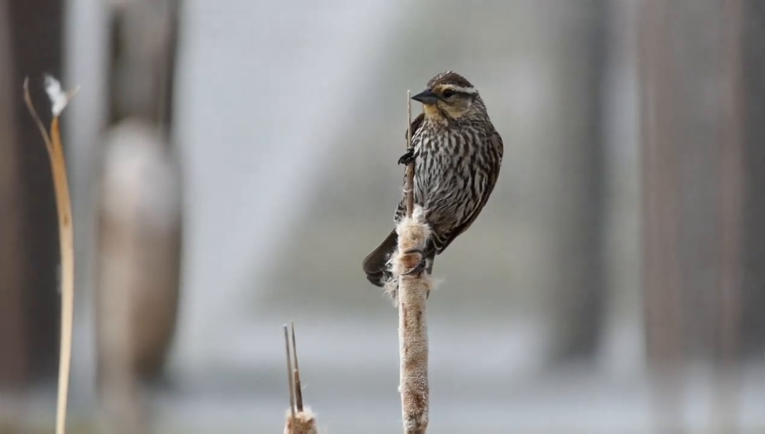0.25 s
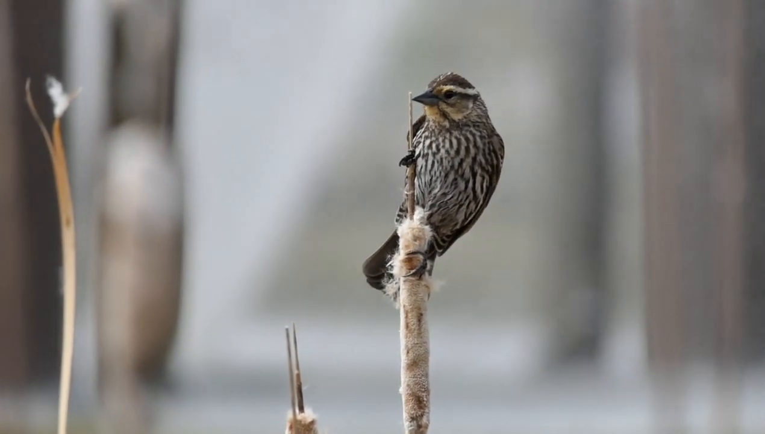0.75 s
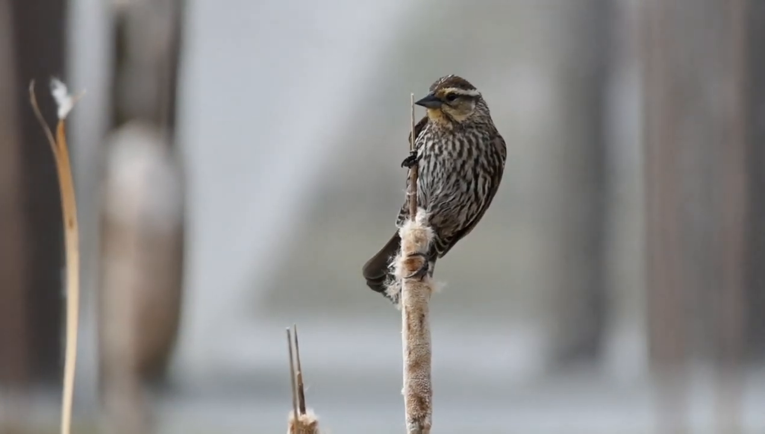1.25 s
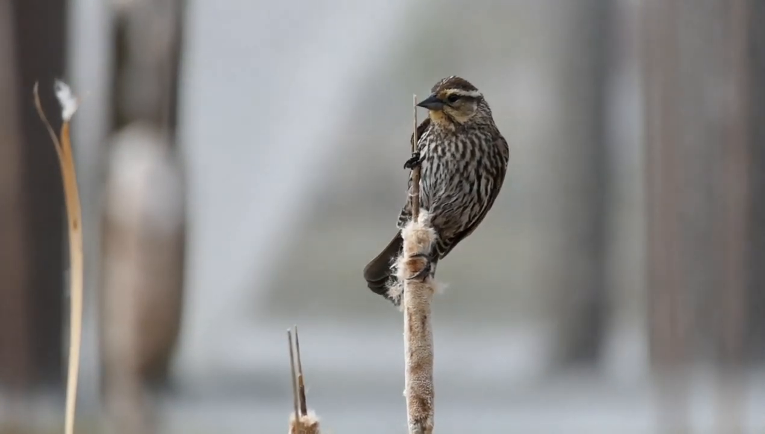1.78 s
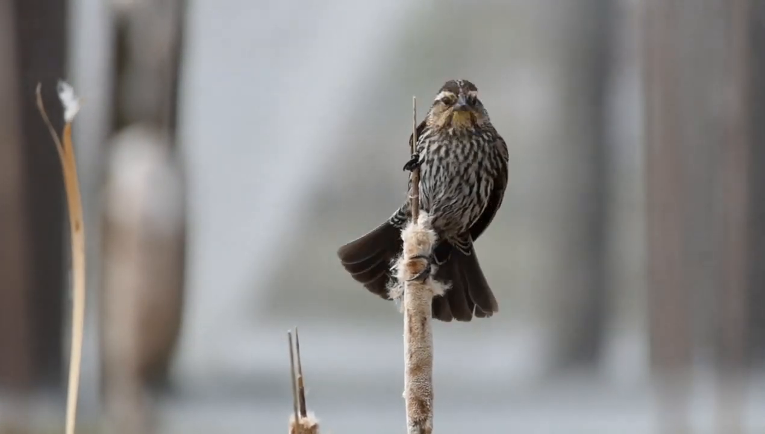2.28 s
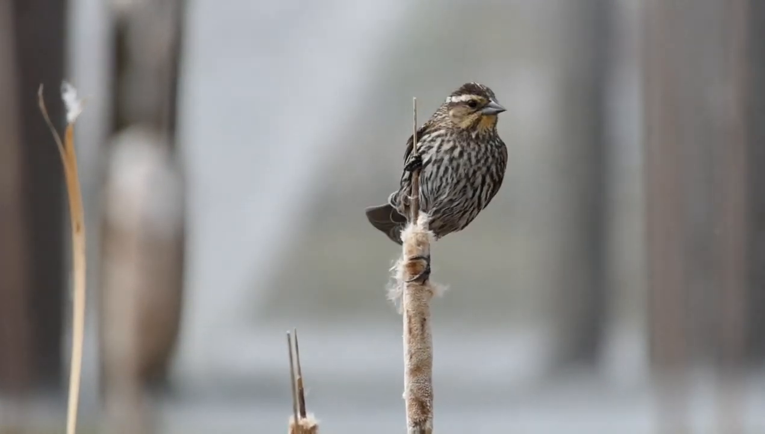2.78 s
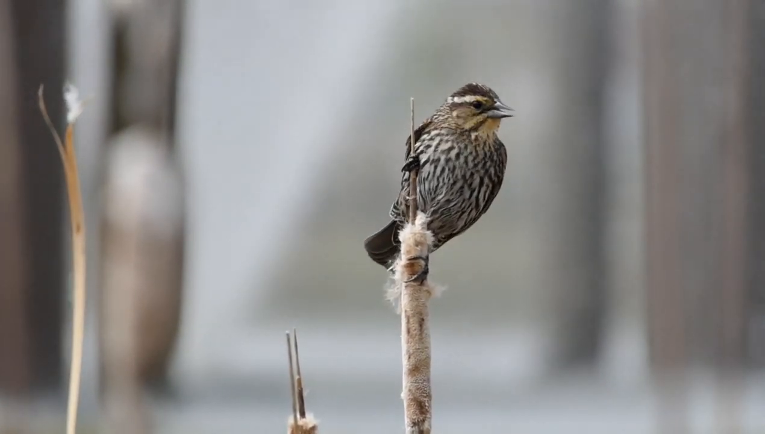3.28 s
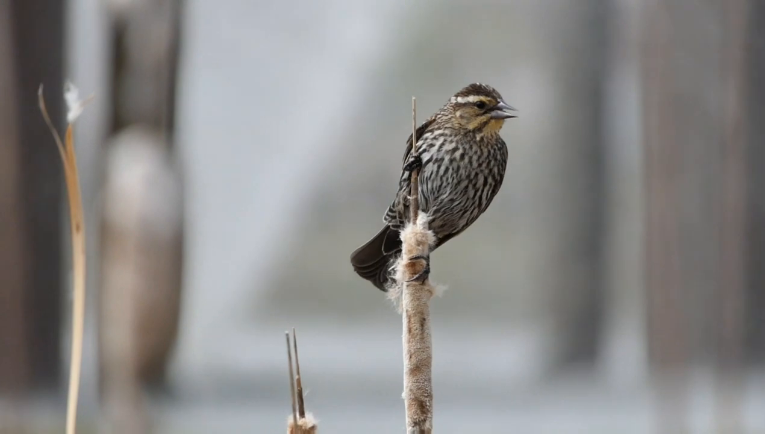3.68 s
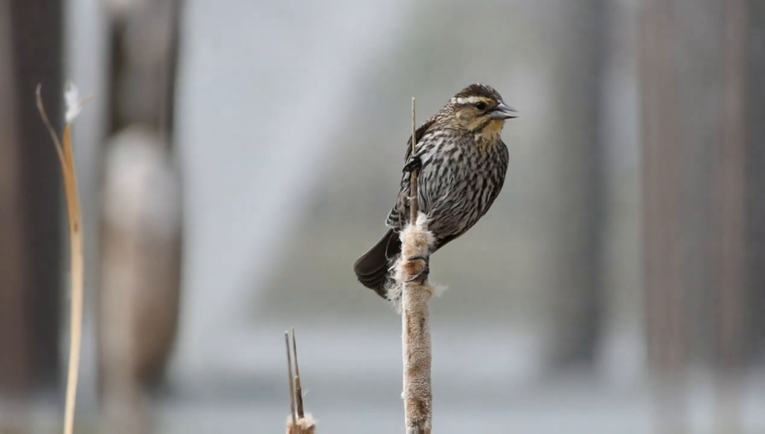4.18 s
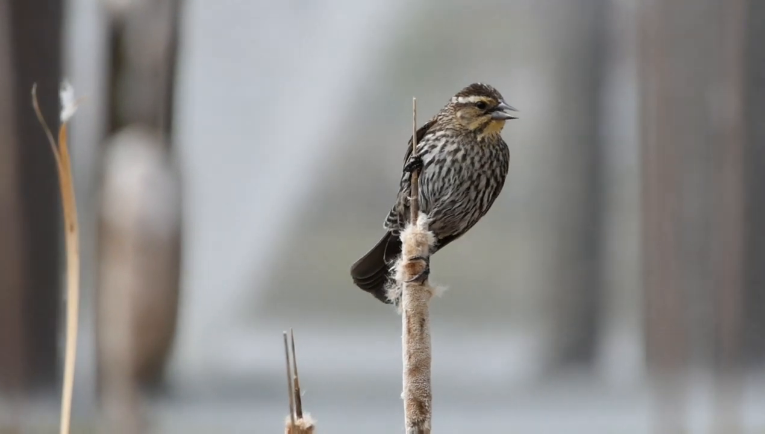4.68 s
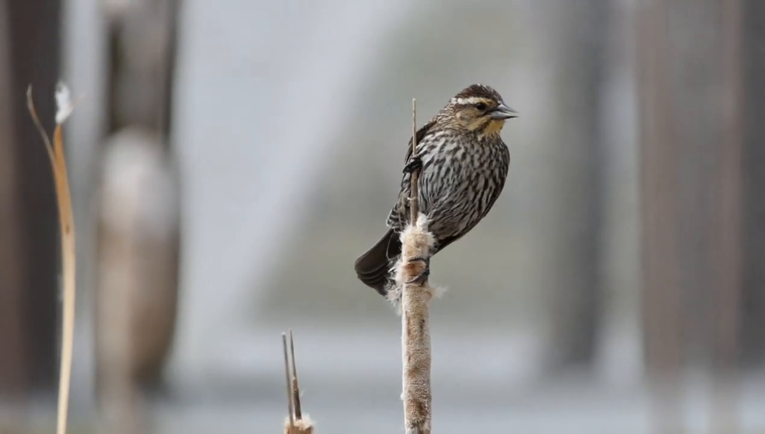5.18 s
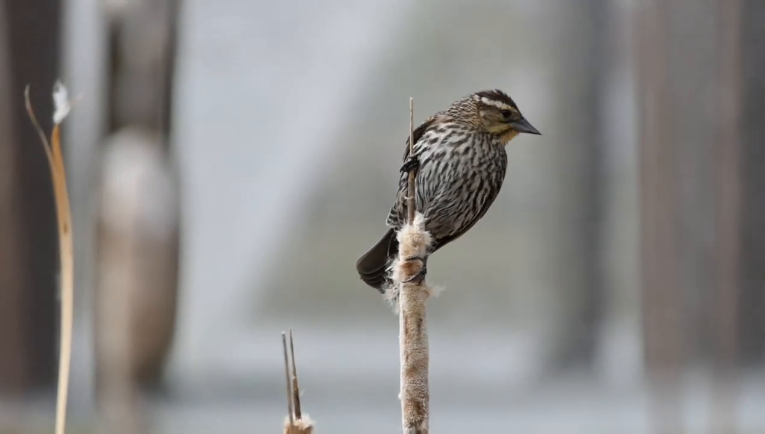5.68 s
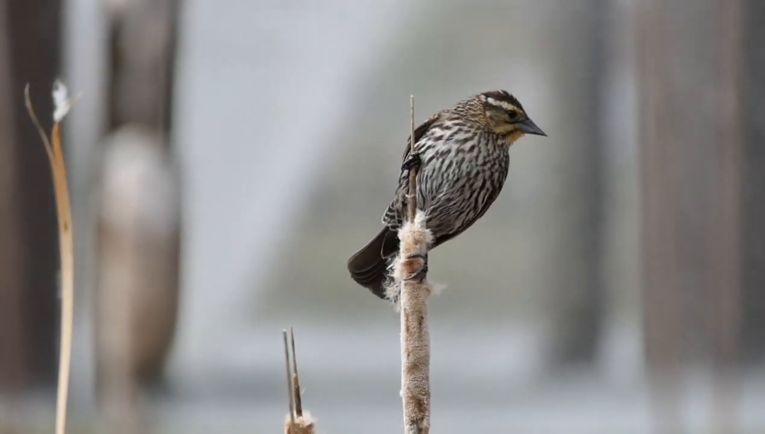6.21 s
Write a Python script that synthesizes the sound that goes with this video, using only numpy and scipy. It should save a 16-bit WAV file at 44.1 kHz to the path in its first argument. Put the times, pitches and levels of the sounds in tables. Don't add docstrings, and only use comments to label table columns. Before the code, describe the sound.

A near streaky brown bird on a reed rasps twice, and another to the left whistles a high note that drops and flattens. Small dry clicks follow, a second whistle, more chacks, then a fast gliding chatter in the centre that gets louder. A faint last whistle wavers out. Distant tyres and engines drone throughout; the reeds give light echoes, and the close microphone sounds slightly dull on top.

```python
import sys
import numpy as np
from scipy import signal
from scipy.fft import rfft, irfft, next_fast_len
from scipy.io import wavfile
from scipy.ndimage import uniform_filter1d

SR = 44100
rng = np.random.default_rng(int(sys.argv[2]) if len(sys.argv) > 2 else 0)


def boost_factor(decibels):
    exponent = np.asarray(decibels, float) / 20
    return 10 ** exponent


def int16_out(signal):
    q = np.round(np.clip(np.atleast_2d(signal).T, -1, 1) * 32767)
    wavfile.write(sys.argv[1], SR, q.astype(np.int16))


N = 284445
T = np.arange(N) / SR

# (frequency [Hz], level [dB per Hz])
ROAR = [(41, -50), (70, -3), (96, -18), (176, -3), (210, -1.5), (249, -10), (288, -6.5), (368, -21.5),
        (491, -7.5), (567, -7.5), (646, -4), (861, -12.5), (1270, -7), (2020, -18), (2200, -17),
        (2860, -48), (4840, -120)]
# (frequency [Hz], level [dB per Hz])
HISS = [(1060, -12.5), (1800, -1.5), (2090, -10.5), (2360, -2), (2980, -0.5), (3600, -5.5), (4650, -14),
        (5120, -11.5), (6350, -15.5), (7630, -14.5), (8670, -21.5), (10100, -29.5), (11200, -36),
        (11700, -37), (12100, -80), (15800, -109), (22000, -120)]
# (frequency [Hz], likeness [0 to 1])
LIKENESS = [(60, 0.33), (130, 0.94), (270, 0.77), (570, 0.92), (1220, 0.86), (2590, 0.92), (5500, 0.84),
            (11700, 0.77)]
# (frequency [Hz], left over right [dB])
TRAFFIC_TILT = [(60, -0.5), (170, -0.5), (490, -2.5), (1420, -0.5), (4070, 0), (11700, -0.5)]

# (pitch [Hz], pitch wander [Hz], level wander [dB])
DRONES = [(172.7, 1.26, 0), (239.8, 1.37, 2)]
# (start [s], length [s], level [dB])
LOWER_SURGES = [(0.042, 0.41, -29), (0.462, 0.13, -26), (.66, 0.15, -26.5), (.88, .5, -32),
                (1.935, 0.3, -29.5), (2.277, 0.21, -28), (2.59, 0.28, -31), (3.48, 0.29, -36),
                (4.04, 0.079, -31), (4.35, 0.14, -32.5), (5.188, 0.57, -35.5), (5.84, 0.93, -31)]
# (start [s], length [s], level [dB])
UPPER_SURGES = [(0.017, 0.83, -33), (0.863, 0.86, -28.5), (1.955, 0.89, -29), (2.87, 0.087, -25),
                (3.214, 0.29, -27.5), (3.56, 0.09, -26), (3.87, .19, -28.5), (4.17, 0.19, -30.5),
                (4.6, 0.4, -45), (6.226, 0.31, -37)]
# (pitch [Hz], level over the deep tone [dB])
DEEP_TONES = [(54, 0), (107, -2.5), (135, 2.5), (312, -3), (265, -6)]
# (time [s], spread [s], level [dB])
PASSES = [
    (.4, 0.27, 4),
    (2.3, 0.23, 0.5),
    (4.55, .35, 2.5),
]

# (peak time [s], spread [s], level [dB], buzz [Hz])
CHACKS = [
    (0.016, 0.011, -19.5, 461),
    (0.078, 0.013, -11, 399),
    (3.25, .011, -14, 452),
    (3.459, 0.013, -11.5, 478),
    (3.559, 0.013, -31, 428),
    (3.692, 0.027, -24.5, 450),
    (4.354, 0.012, -23, 453),
    (4.862, 0.0065, -44, 300),
    (4.891, .006, -31, 450),
    (4.936, 0.011, -26, 539),
]
# (frequency [Hz], width [Hz], level [dB])
CHACK_THROAT = [(2560, 680, 4), (3294, 740, 6), (5270, 870, -21), (7000, 1260, -16), (10070, 760, -23),
                (1360, 310, -3)]

# (time [s], peak level [dB], ring [Hz])
TICKS = [(0.628, -13, 2570), (1.631, -23, 2940), (2.0518, -13, 3030), (2.071, -14, 3000),
         (2.0892, -16, 2240), (2.1155, -9, 2760), (2.1829, -11, 2900), (2.361, -11.5, 2930),
         (2.733, -15, 2730), (2.7531, -13, 3060), (3.3728, -14, 2480), (3.877, -10, 2760),
         (5.728, -20, 2470), (6.2984, -13, 2520)]

# (time [s], length [s], level [dB], from [Hz], to [Hz])
CHIRPS = [
    (.751, .010, -22, 3700, 4500),
    (4.898, .006, -19, 2300, 3400),
    (5.383, .004, -33, 5200, 8200),
]

# (crest time [s], late sag [Hz per s], last bend length [s], last bend [Hz], overtones [dB])
WHISTLES = [
    (.778, -41, 0.039, -130, 0.5),
    (2.8, -250, .12, 129.5, 1.5),
    (5.353, -230, .075, 87, -14),
]
# (time [s], level [dB])
WHISTLE_LEVEL = [
    [(0.765, -27), (0.791, -6), (0.815, -4), (0.925, -12), (0.955, -5), (1.117, -4.5), (1.263, -11),
     (1.285, -32), (1.29, -38)],
    [(2.79, -23), (2.804, -13), (2.83, -4.5), (2.92, -7.5), (2.932, -10.5), (3.166, -5), (3.258, -11.5),
     (3.278, -17), (3.305, -37)],
    [(5.338, -35), (5.382, -12.5), (5.46, -16.5), (5.47, -29.5), (5.5, -13), (5.79, -15), (5.828, -26),
     (5.836, -21), (5.85, -36)],
]
WHISTLE_LIFT = [0, 18, -5.5]
# (time after the crest [s], pitch [Hz])
FALL = [(-.014, 3270), (0, 3470), (.008, 3400), (.022, 3060), (.034, 2825), (.052, 2680), (.085, 2590),
        (.2, 2500), (.29, 2466)]
# (frequency [Hz], left over right [dB])
WHISTLE_PAN = [(2450, 7.5), (2700, 8.5), (3400, 4)]
# (multiple of the pitch, level under the tone [dB])
OVERTONES = [(2, -42), (3, -28), (4, -56)]

# (time [s], length [s], level [dB], swell from start to end [dB])
NOTES = [
    (3.803, .040, -15, -3),
    (3.906, 0.049, -14.5, -4),
    (4.018, 0.05, -11.5, 2),
    (4.131, .058, -12.5, 3),
    (4.248, 0.054, -11.5, 6),
    (4.372, 0.053, -13.5, -4),
    (4.487, .059, -9, 3),
    (4.615, .057, -8.5, 3.5),
    (4.752, 0.053, -7.5, 7),
]
# (first crest [Hz], dip [Hz], second crest [Hz])
TUNES = [
    (3600, 3620, 3880),
    (3600, 2900, 3100),
    (3570, 3330, 3760),
    (3450, 3260, 3330),
    (3290, 3130, 3170),
    (3224, 3060, 3180),
    (3520, 2930, 3524),
    (3350, 3120, 3440),
    (3256, 3230, 3150),
]
NOTE_KNOTS = [0, .16, .27, .54, .76, 1]
HEAD_TURN = (1.5, -2.2)
# (frequency [Hz], level [dB])
CHATTER_THROAT = [(2200, 1.5), (2800, 0.5), (3200, 3), (3700, -2.5)]
# (time [s], level [dB])
BREAKS = [(3.826, -2), (3.932, -10), (3.942, -11), (4.056, -2), (4.179, -7), (4.383, -2), (4.399, -20),
          (4.410, -13), (4.501, -5), (4.512, -4), (4.269, -2), (4.633, -3.5), (4.657, 0), (4.791, -3)]

# (time [s], level [dB])
GAIN = [(0, -1), (.5, 0), (.78, 0), (1.15, -3.5), (2.0, -1.5), (2.65, 0), (2.98, -2), (3.7, 0), (4.74, 1.5),
        (4.9, 3), (4.908, -4.5), (5.2, -4.5), (6.05, -3.5), (6.45, -3)]
# (frequency [Hz], width [Hz], level [dB])
NOTCH = (4640, 110, -6)


def evened(x):
    return x / np.sqrt(np.mean(x ** 2) + 1e-20)


def read(points, hz):
    f, value = np.transpose(points)
    return np.interp(np.log(hz + 1), np.log(f + 1), value)


def curve(rows, t=T):
    return np.interp(t, *np.transpose(rows))


def pan(x, db):
    left = boost_factor(db) / (1 + boost_factor(db))
    return 2 * np.array([left * x, (1 - left) * x])


def wander(size):
    once = uniform_filter1d(rng.standard_normal(N), size)
    return evened(uniform_filter1d(once, size))


def wash(spectrum, band, patchy_db):
    frames, hz = N // 512 + 5, np.fft.rfftfreq(2048, 1 / SR)
    a, b, c, d, patches = rng.standard_normal((frames, 1025, 5)).T
    patches = uniform_filter1d(patches, size=20, axis=0)
    patches = evened(uniform_filter1d(patches, size=6, axis=1))
    same = np.clip(read(LIKENESS, hz), -1, 1)[:, None]
    left = a + 1j * b
    right = same * left + np.sqrt(1 - same ** 2) * (c + 1j * d)
    right = right / boost_factor(read(TRAFFIC_TILT, hz))[:, None]
    gain = boost_factor(read(spectrum, hz))
    spectra = np.array([left, right]) * gain[:, None] * boost_factor(patchy_db * patches)
    x = evened(signal.istft(spectra, nperseg=2048, noverlap=1536)[1][:, :N])
    inside = (hz > band[0]) & (hz < band[1])
    return x * np.sqrt(np.sum(gain ** 2) / np.sum(gain[inside] ** 2))


def traffic():
    roar = wash(ROAR, (400, 1800), patchy_db=1.0) * boost_factor(-23.5)
    hiss_db = -37 + 0.45 * np.maximum(curve(GAIN), 0) + 0.81 * wander(size=300)
    hiss = wash(HISS, (4500, 7000), patchy_db=1.33) * boost_factor(hiss_db)
    return roar + hiss


def hum():
    idle_db, edge_s = -31.5, 0.043
    drones, tones = np.zeros(N), np.zeros((2, N))
    for surges, (hz, width, db) in zip((LOWER_SURGES, UPPER_SURGES), DRONES):
        size = boost_factor(idle_db)
        for s, length, surge_db in surges:
            size = size + boost_factor(surge_db) * np.clip(np.minimum(T - s, s + length - T) / edge_s, 0, 1)
        phase = 2 * np.pi * np.cumsum(hz + width * wander(size=3000)) / SR
        waver_db = db * wander(size=3000) + wander(size=1500)
        drones += size * boost_factor(waver_db) * np.sin(phase)
    deep_db = -40 + sum(db * np.exp(-((T - s) / spread) ** 2) for s, spread, db in PASSES)
    for k, (hz, db) in enumerate(DEEP_TONES):
        phase = 2 * np.pi * np.cumsum(hz * (1 + wander(size=5000) / 300)) / SR
        waver_db = k * wander(size=4000)
        lead = 0.59 * DEEP_TONES[0][0] / hz * np.array([[.5], [-.5]])
        tones += boost_factor(deep_db + db + waver_db) * np.sin(phase + lead)
    return np.sqrt(2) * (pan(drones, -2.6) + tones * boost_factor(np.array([[-.4], [.4]])))


def resonate(x, hz, width):
    turn = np.exp(2j * np.pi * hz * np.arange(len(x)) / SR)
    r = np.exp(-np.pi * width / SR)
    return 2 * (turn * signal.lfilter([1 - r], [1, -r], x / turn)).real


def chacks():
    out, reach = np.zeros(N), 2500
    for s, spread, db, buzz_hz in CHACKS:
        peak = round(s * SR)
        t = np.arange(-min(reach, peak), reach) / SR
        jitter, strength, breath = rng.standard_normal((2 * reach, 3))[:len(t)].T
        buzz = buzz_hz * (1 + 0.23 * evened(uniform_filter1d(jitter, size=60)))
        cycles = np.floor(np.cumsum(buzz) / SR)
        pulses = np.diff(cycles, prepend=0) * (1 + 0.27 * strength)
        drive = evened(pulses) + breath
        throat = np.zeros(len(t))
        for k, (hz, width, level_db) in enumerate(CHACK_THROAT):
            ring = resonate(resonate(drive, hz, width), hz, width)
            throat += (-1) ** k * boost_factor(level_db) * ring
        swell = np.exp(-.5 * abs(t / spread) ** 2)
        out[peak + reach - len(t):peak + reach] += boost_factor(db) * evened(throat) * swell
    return pan(out, -0.43)


def marsh(x, first_s, t60):
    size, gap = SR // 2, 40
    taps = np.zeros((2, size))
    at = np.arange(round(first_s * SR), size - gap, gap)
    at = at + rng.integers(0, gap, (2, SR // 80))[:, :len(at)]
    signs = rng.choice([-1., 1.], (2, SR // 80))[:, :at.shape[1]]
    np.put_along_axis(taps, at, signs, 1)
    taps[1] = taps[0] + 0.53 * taps[1]
    taps *= boost_factor(-60 * T[:size] / t60)
    return signal.oaconvolve(x, taps / np.linalg.norm(taps[0]), axes=1)[:, :N]


def ticks():
    out, t = np.zeros(N), np.arange(300) / SR
    for s, db, hz in TICKS:
        grit = uniform_filter1d(rng.standard_normal(300), size=4) * np.exp(-t / .0004)
        ring = np.sin(2 * np.pi * hz * t) * np.exp(-t / .0007)
        snap = (ring + .5 * grit) * np.clip(t / .00015, 0, 1)
        start = round(s * SR)
        out[start:start + 300] += boost_factor(db + 4.0) * snap
    return pan(out, -.5)


def chirps():
    out = np.zeros(N)
    for s, length, db, from_hz, to_hz in CHIRPS:
        hz = np.linspace(from_hz, to_hz, round(length * SR))
        sweep = np.sin(2 * np.pi * np.cumsum(hz) / SR) * signal.windows.tukey(len(hz), .5)
        out[round(s * SR):][:len(hz)] += boost_factor(db) * sweep
    return pan(out, .5)


def whistles():
    out = np.zeros((2, N))
    for whistle, level, lift_hz in zip(WHISTLES, WHISTLE_LEVEL, WHISTLE_LIFT):
        s, sag_hz, bend_s, bend_hz, beak_db = whistle
        t, start, end = T - s, level[0][0], level[-1][0]
        hz = curve(FALL, t) + lift_hz
        hz = hz + sag_hz * np.clip(t - FALL[-1][0], 0, 1)
        hz = hz + bend_hz * np.clip(1 + (T - end) / bend_s, 0, 1)
        hz = uniform_filter1d(hz, size=400) * (1 + wander(size=600) / 2000)
        phase = 2 * np.pi * np.cumsum(hz) / SR
        on = uniform_filter1d(1. * (T > start) * (T < end), size=300)
        effort_db = uniform_filter1d(curve(level), size=200) + .5 * wander(size=150)
        size = np.sqrt(2) * on * boost_factor(effort_db)
        out += pan(size * np.sin(phase), read(WHISTLE_PAN, hz))
        steady = np.minimum(uniform_filter1d(size, size=3000), 3 * size)
        beak = beak_db + curve([(0, -26), (.06, 4), (end - s, -5)], t)
        overtones = np.zeros(N)
        for multiple, db in OVERTONES:
            overtones += boost_factor(db + beak + wander(size=900)) * np.sin(multiple * phase)
        out -= pan(steady * overtones, .1)
    return out


def chatter():
    out = np.zeros((2, N))
    sides_db = np.linspace(*HEAD_TURN, len(NOTES))
    for (s, length, db, swell_db), crests, side_db in zip(NOTES, TUNES, sides_db):
        t = np.arange(round(length * SR)) / SR
        path_hz = [2560, crests[0] - 110, *crests, 2090]
        hz = np.interp(t / length, NOTE_KNOTS, path_hz)
        phase = 2 * np.pi * np.cumsum(uniform_filter1d(hz, size=130)) / SR + 2 * np.pi * rng.random()
        fade = np.clip(t / 0.0076, 0, 1) * np.clip((length - t) / 0.011, 0, 1)
        overtones = boost_factor(-34) * np.sin(2 * phase) + boost_factor(-33) * np.sin(3 * phase)
        tone = np.sin(phase) + fade * overtones
        level = boost_factor(db + 1.0 + swell_db * (t / length - .5) + read(CHATTER_THROAT, hz))
        start = round(s * SR)
        out[:, start:start + len(t)] += pan(level * fade * tone, side_db)
    catch_db = sum(db * np.exp(-((T - s) / 0.0033) ** 2) for s, db in BREAKS)
    return out * boost_factor(catch_db)


def colour(x, gain_db):
    size = next_fast_len(N)
    gain = boost_factor(gain_db(np.fft.rfftfreq(size, 1 / SR)))
    return irfft(rfft(x, size) * gain, size)[:, :N]


def scene():
    background = (traffic() + hum()) * boost_factor(curve(GAIN))
    near = chacks() + ticks() + chirps() + chatter()
    near = near + boost_factor(-9.5) * marsh(near, 0.0091, 0.066)
    far = whistles()
    bank = boost_factor(-21) * np.roll(far, round(0.02 * SR), axis=1)
    far = far + bank + boost_factor(-20.0) * marsh(far, .02, 0.3)
    return far + near + background


def top_cut(x):
    return signal.sosfilt(signal.butter(12, 15500, fs=SR, output="sos"), x)


def record(dry):
    notch_hz, width, notch_db = NOTCH

    def microphone_db(f):
        return notch_db * np.exp(-((f - notch_hz) / width) ** 2) + read([(11500, -0.5), (12500, -39)], f)

    x = colour(dry, microphone_db)
    drop_s = 4.904
    dip_db = -4 * (T > drop_s) * np.clip((drop_s + .028 - T) / .012, 0, 1)
    x = x * boost_factor(dip_db)
    knee, room = .87, .09
    over = np.maximum(abs(x) - knee, 0)
    held = x - np.sign(x) * (over - room * np.tanh(over / room))
    held = colour(held, lambda f: read([(12000, -0.5), (12450, -7.0), (12700, -24)], f))
    return top_cut(held)


dry = scene()
out = record(dry)
int16_out(out)
```